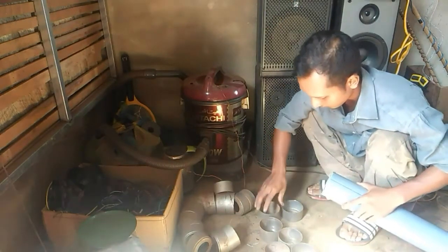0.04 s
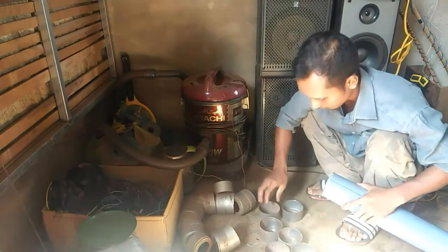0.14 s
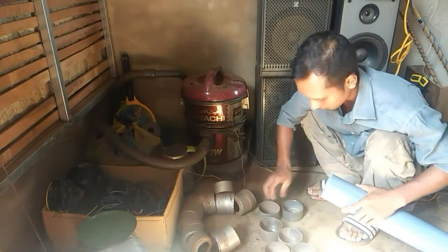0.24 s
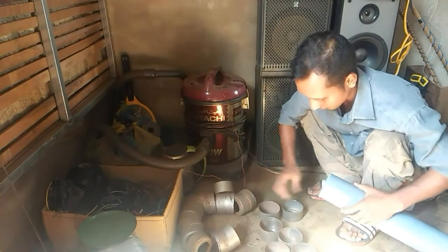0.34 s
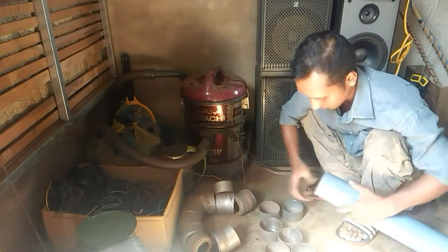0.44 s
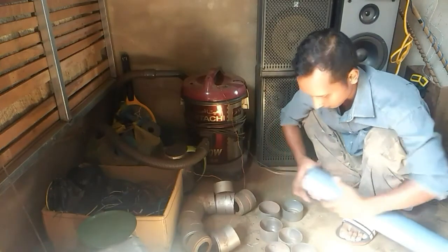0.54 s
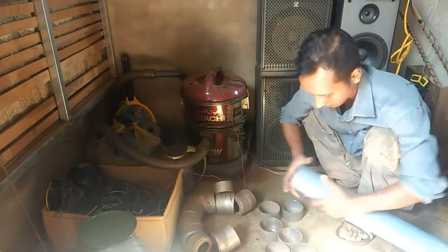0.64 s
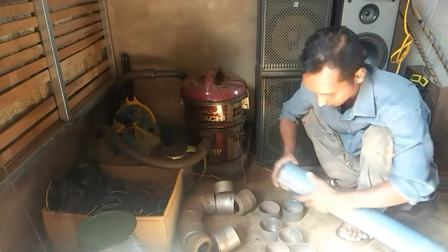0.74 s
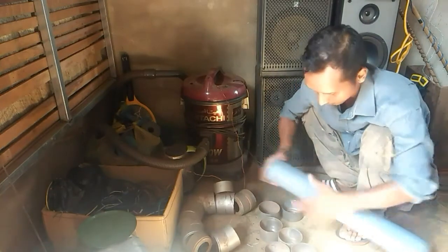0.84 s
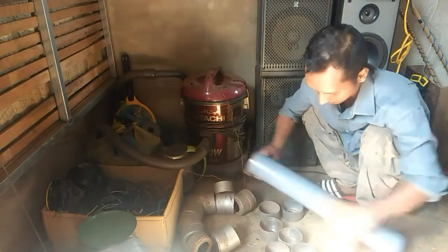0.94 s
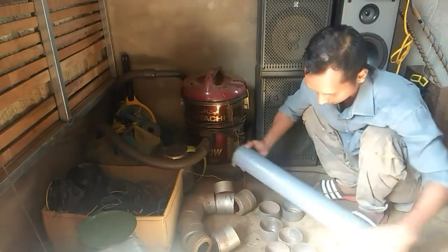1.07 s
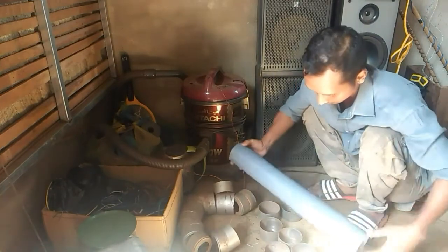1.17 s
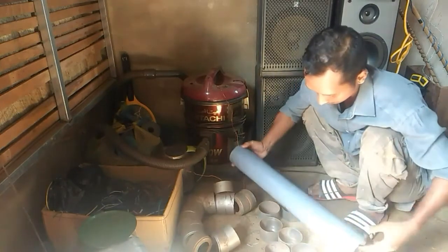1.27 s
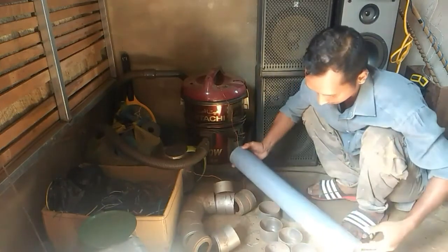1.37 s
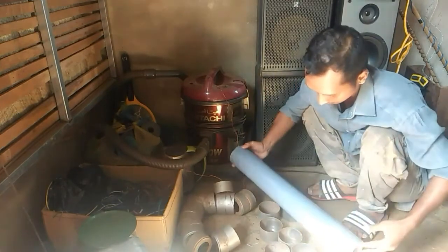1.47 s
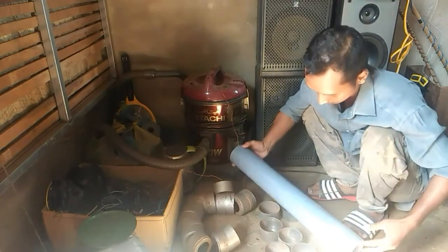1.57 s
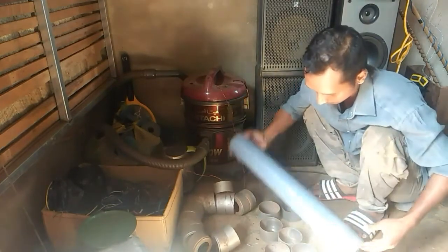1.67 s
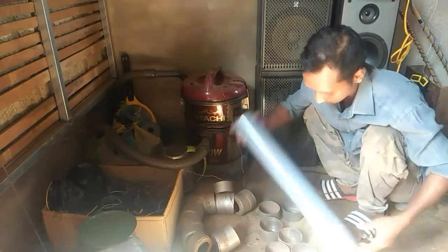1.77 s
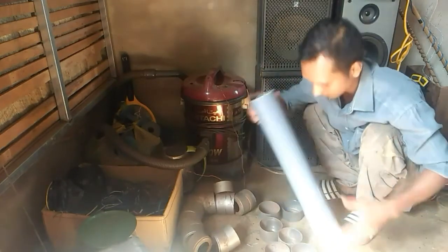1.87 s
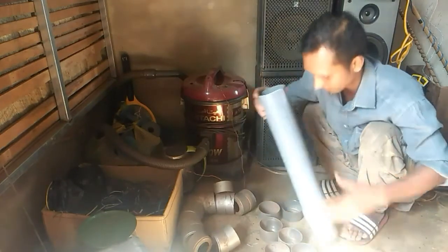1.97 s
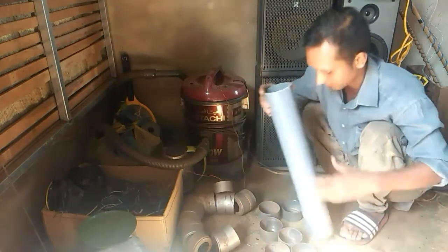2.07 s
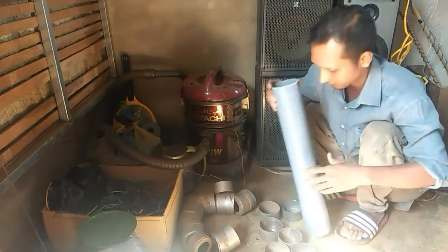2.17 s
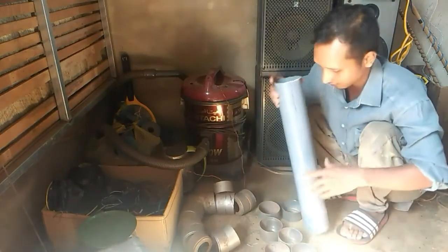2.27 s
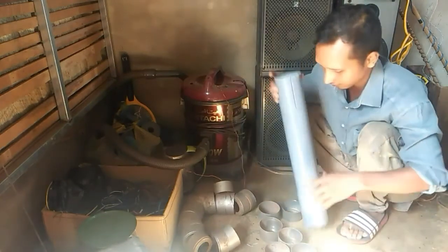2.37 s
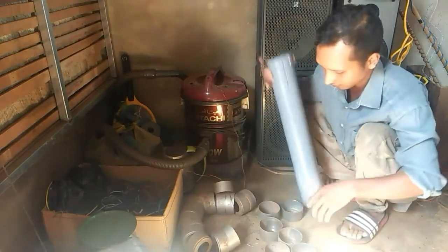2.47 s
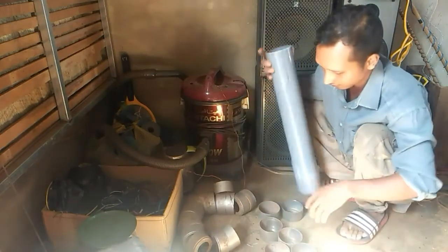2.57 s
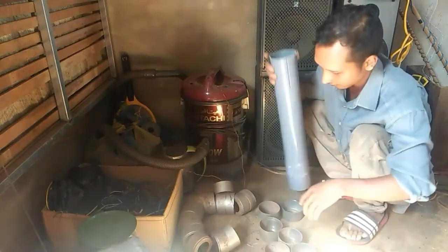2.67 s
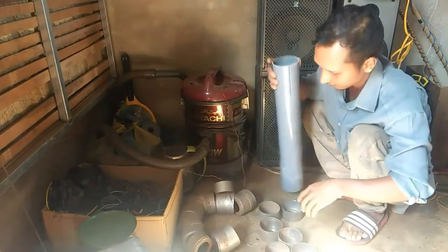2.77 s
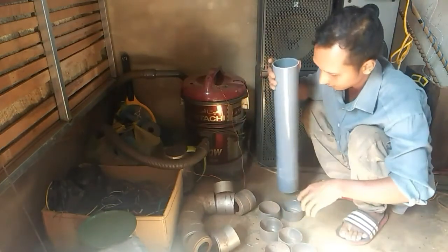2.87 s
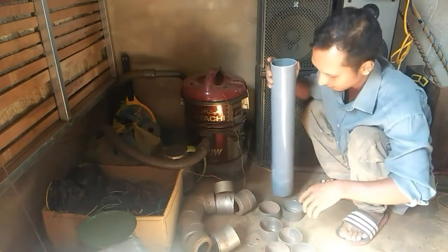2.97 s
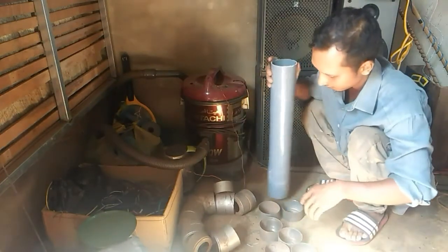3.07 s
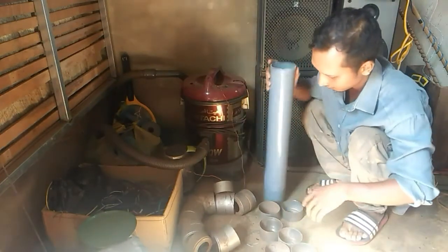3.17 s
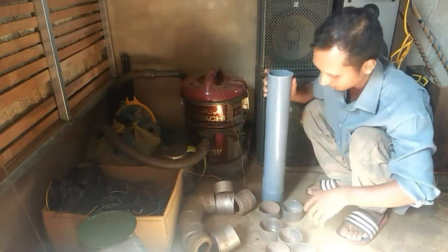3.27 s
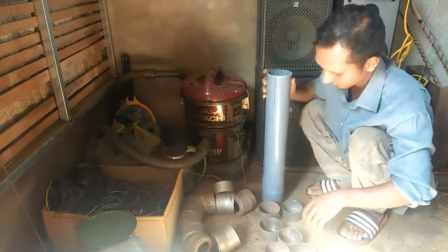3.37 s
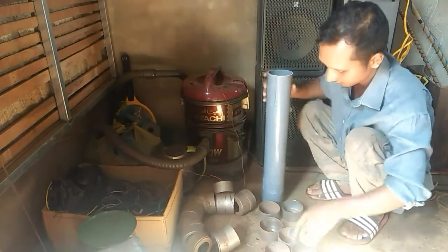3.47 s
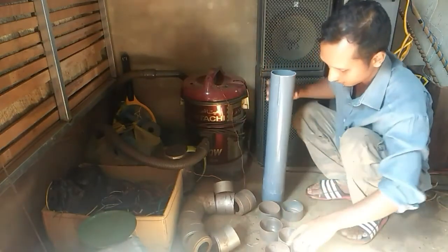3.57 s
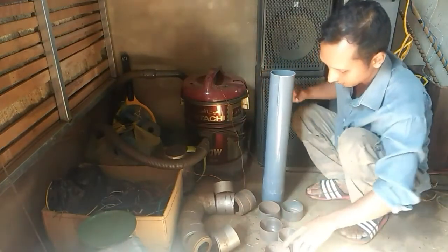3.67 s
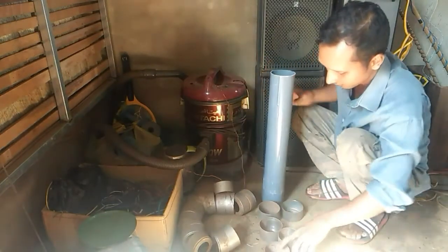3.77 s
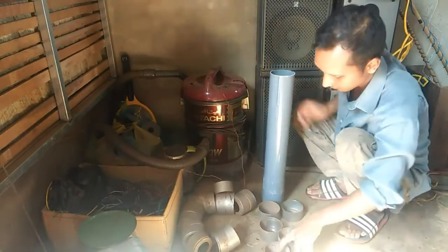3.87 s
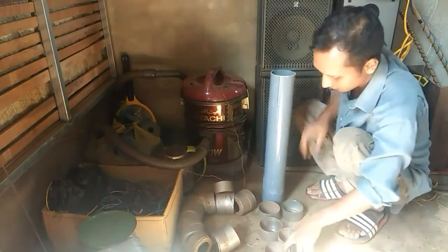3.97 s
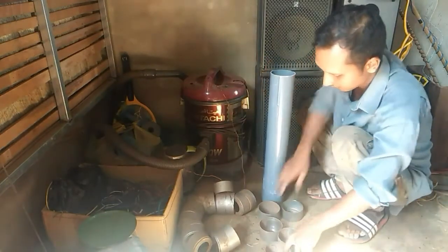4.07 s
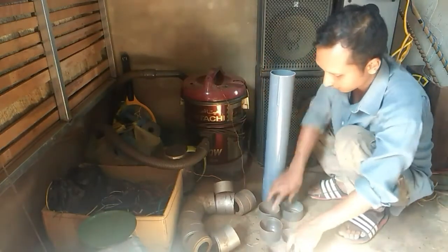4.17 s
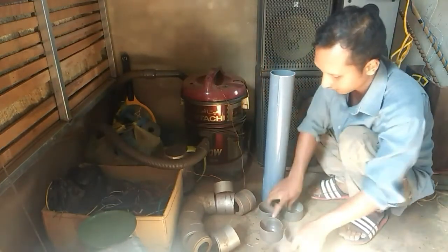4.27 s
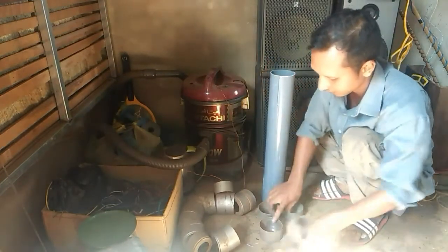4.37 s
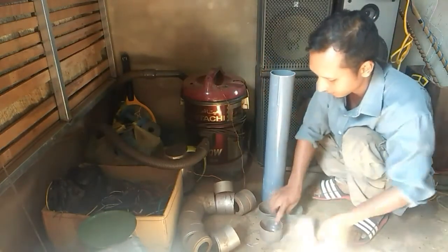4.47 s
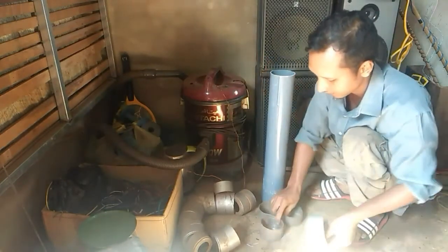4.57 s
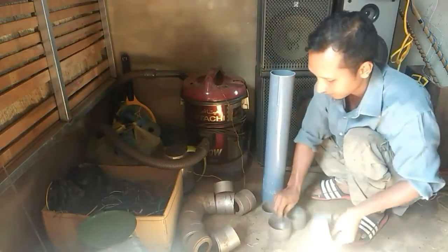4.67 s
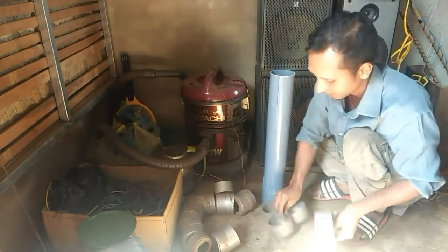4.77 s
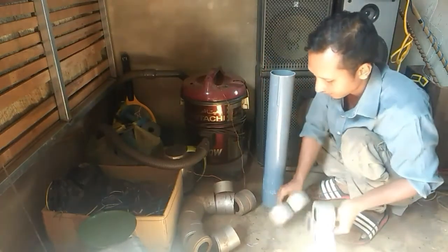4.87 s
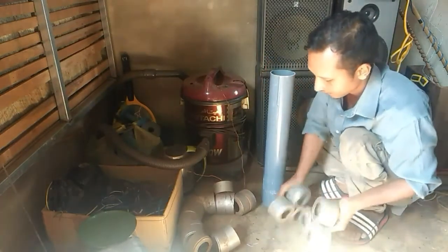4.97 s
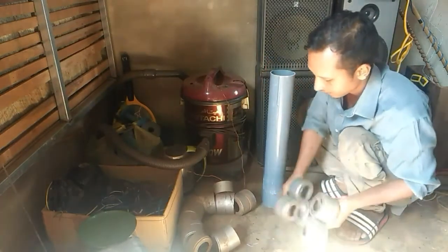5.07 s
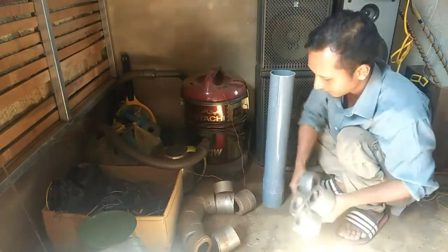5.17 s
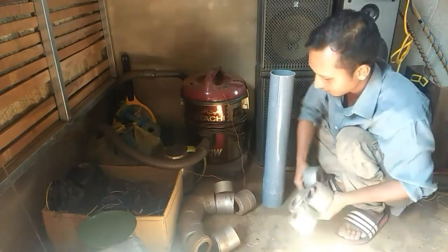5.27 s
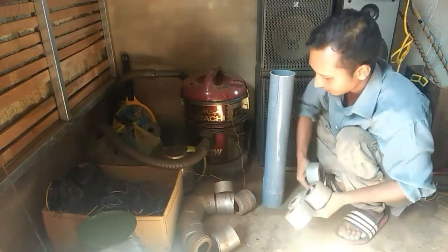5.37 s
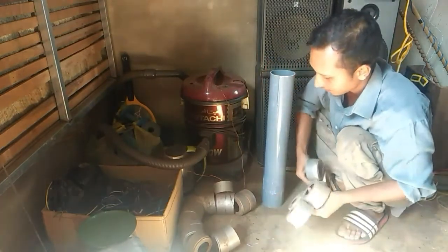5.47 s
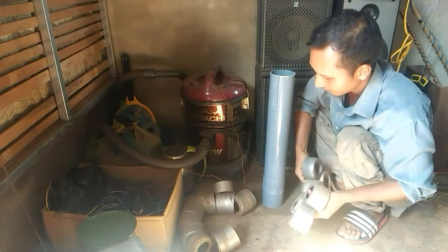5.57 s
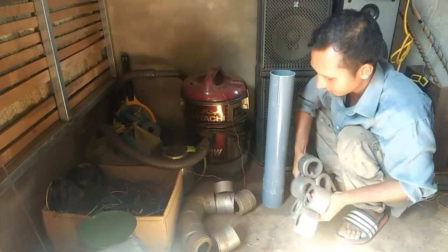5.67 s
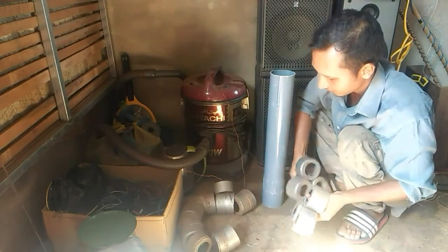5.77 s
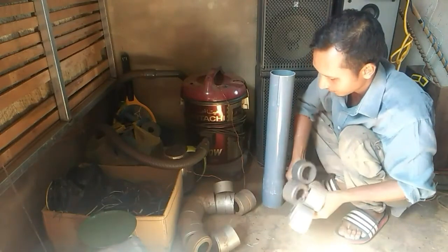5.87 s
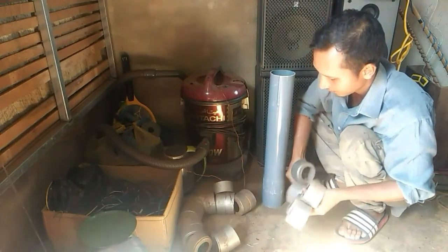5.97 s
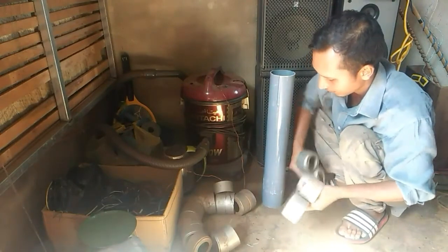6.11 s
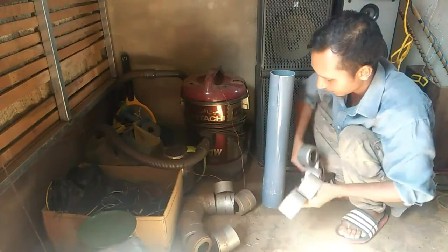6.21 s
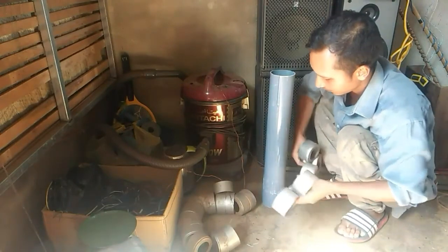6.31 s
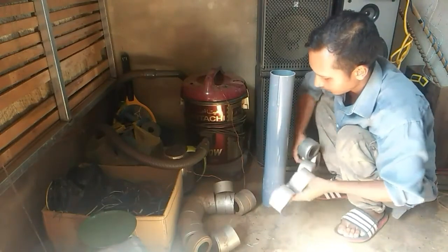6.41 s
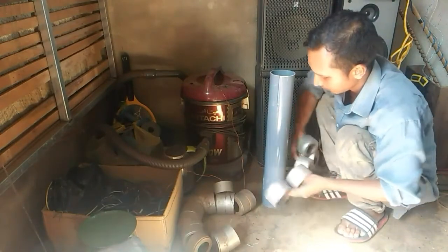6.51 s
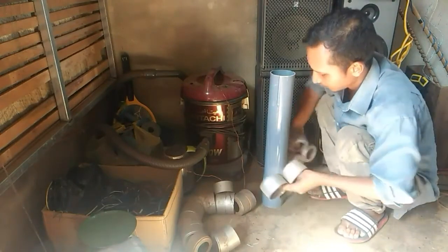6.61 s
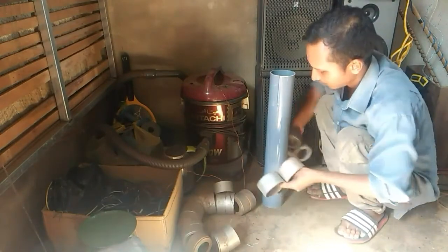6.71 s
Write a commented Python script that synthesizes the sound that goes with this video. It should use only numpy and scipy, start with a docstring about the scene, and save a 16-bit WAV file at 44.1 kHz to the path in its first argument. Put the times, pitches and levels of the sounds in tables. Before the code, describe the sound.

A plastic pipe rasps over gritty concrete, knocks down hollowly on end, then short steel tubes clatter and clink in a small hard room.

```python
"""A small hard-walled room: a plastic pipe slides over concrete and is stood on end with a hollow knock.
Short steel tubes are gathered: they scrape, clatter and clink. Faint tones, a hum and a rumble lie behind.
Impacts ring decaying modes under enveloped noise; friction is random slips through colours and modes.
Tones are sines or resonant noise; hum and rumble are shaped noise."""
import sys
import numpy as np
from scipy import signal
from scipy.fft import rfft, irfft
from scipy.io import wavfile

SR = 44100
rng = np.random.default_rng(int(sys.argv[2]) if len(sys.argv) > 2 else 0)


def log_audio(samples):
    """Write samples as a 16-bit WAV file to the path given in sys.argv[1]."""
    # one column per channel
    frames = np.atleast_2d(samples).T
    # limit to full scale, then quantise
    limited = np.clip(frames, -1, 1)
    pcm = np.round(limited * 32767).astype(np.int16)
    wavfile.write(sys.argv[1], SR, pcm)


N = 297436
TIME = np.arange(N) / SR

# In all tables, rel_db is a relative level, before the gains of the layer.
# ring modes per steel tube: pitch_hz, rel_db, t60_s
TUBE_MODES = {"short": [(3400, -14, 0.12), (4437, -0.5, 0.21), (5880, -4.5, 0.12), (6630, 3, 0.21),
              (7640, -3, 0.18), (9900, 3.5, 0.088), (10240, -1.5, 0.21), (11100, -8, 0.086),
              (12900, -15, 0.31)], "long": [(2216, -8.5, 0.25), (4247, -17.5, 0.29), (6770, -14, 0.14),
              (8580, -6, 0.16), (9100, -14, 0.14), (11390, 3, 0.055), (13200, -6, 0.16)],
              "thin": [(4280, -15.5, 0.74), (5900, -7.5, 0.44), (7930, -0.5, 0.28), (8800, -2, 0.17),
              (11690, -4, 0.23), (13650, -2, 0.31)], "thick": [(2840, -12.5, 0.2), (3210, -19, 0.35),
              (3694, -26, 0.37), (4100, -17, 0.33), (5170, -18.5, 0.88), (5980, -16, 0.3), (6460, -2, 0.11),
              (7980, -1, 0.14), (8440, -17, .2), (9600, 0.5, 0.087)], "wide": [(3140, -3, 0.12),
              (5155, -22.5, 0.23), (8440, 6.5, 0.067), (9800, -5, .13), (11140, -5, 0.11), (13200, -2, .1)],
              "gripped": [(2830, -1, 0.23), (4300, 0.5, 0.19), (5173, -6, 0.42)],
              "light": [(4490, -2.5, 0.094), (5860, -2, 0.17), (6200, -7, 0.096), (7666, -10, 0.17),
              (12260, 3, 0.066)]}
# air-column and wall modes of the pipe: pitch_hz, rel_db, t60_s
PIPE_MODES = [(217, -17.5, 0.33), (427, -26.5, 0.71), (588, -15.5, 0.61), (635.6, 6.5, 0.26),
              (750, -11, 0.13), (756, -3.5, 0.11), (850, -5.5, 0.12), (864, -5.5, 0.17), (1454, -1, 0.34),
              (1484, -4.5, 0.068), (1580, -19.5, 0.2), (2332, 4, 0.096), (2363, -6, 0.18),
              (2635, -20.5, 0.52), (712, 0, 0.091), (1428, 6, 0.087)]
# spectrum of floor clacks and bumps: freq_hz, rel_db
CLACK_SPECTRUM = [(220, -24), (420, -4.5), (560, -5.5), (760, 6), (1250, 5.5), (1700, 0.5), (2400, -15.5),
                  (3600, -27)]
# spectrum of dull rubbing: freq_hz, rel_db
RUB_SPECTRUM = [(140, -5), (215, -25), (285, -2), (400, -6.5), (600, -2.5), (880, 0.5), (1960, -3.5),
                (3000, -11.5), (4500, -25.5)]
# spectrum of steel scraping and cracks: freq_hz, rel_db
SCRAPE_SPECTRUM = [(3000, -17), (5000, -34.5), (7400, -5), (8700, 4.5), (11500, 1.5), (12400, -13),
                   (13500, 6.5), (14400, -42)]


def from_db(db):
    """Decibels to amplitude gain."""
    return 10 ** (np.asarray(db) / 20)


def rms_one(x):
    """Scale to unit rms."""
    return x / np.sqrt(np.mean(x ** 2) + 1e-20)


def at_hz(points, hz):
    """Interpolate a table on a log-frequency axis."""
    f, value = np.transpose(points)
    return np.interp(np.log(hz + 1e-9), np.log(f), value)


def gains(rows):
    """One gain curve per dB column, silent outside the table."""
    s, *columns = np.transpose(rows)
    return [from_db(np.interp(TIME, s, c, left=-np.inf, right=-np.inf)) for c in columns]


def drift(per_s):
    """Smooth random wandering through per_s knots a second; rms 1."""
    knots = rng.standard_normal(N // 100)
    return rms_one(np.interp(TIME * per_s, np.arange(len(knots)), knots))


def strokes(rows, attack_s, release_s):
    """Summed envelopes of (start_s, length_s, db) strokes: exponential swell, hold, exponential decay."""
    total = 0
    for start_s, length_s, db in rows:
        before = np.maximum(start_s - TIME, 0) / attack_s
        after = np.maximum(TIME - start_s - length_s, 0) / release_s
        total = total + from_db(db) * np.exp(-before - after)
    return total


def strikes(hits):
    """Impulse train from (time_s, db) pairs."""
    out = np.zeros(N)
    for s, db in hits:
        out[max(0, round(s * SR))] += from_db(db)
    return out


def coloured(x, spectrum):
    """Filter to a spectrum with steep skirts past its ends; rms 1."""
    hz = np.arange(N // 2 + 1) * SR / N + 0.00085
    low_skirt = np.minimum(1, hz / spectrum[0][0]) ** 3
    high_skirt = np.minimum(1, spectrum[-1][0] / hz) ** 4
    return rms_one(irfft(rfft(x) * from_db(at_hz(spectrum, hz)) * low_skirt * high_skirt, N))


def grains(per_s, spread_db, clump_db=3.5):
    """Random tiny slips of uneven size, stronger and weaker as the pressure changes; rms 1."""
    size_db = spread_db * np.minimum(rng.exponential(1, N), 4) + clump_db * drift(45)
    slips = rng.random(N) < per_s / SR
    return rms_one(slips * from_db(size_db) * rng.choice([-1, 1], N))


def ring(clicks, hz, t60_s):
    """Two-pole resonance: a unit click rings at about height 1; zero response at 0 Hz."""
    r = np.exp(-np.log(1000) / (t60_s * SR))
    w = 2 * np.pi * hz / SR
    return signal.lfilter([.5, 0, -.5], [1, -2 * r * np.cos(w), r * r], clicks + 1e-18)


def resonant_noise(hz, width_hz):
    """Noise through one resonance, twice for steep skirts; rms 1."""
    t60_s = np.log(1000) / (np.pi * width_hz)
    return rms_one(ring(ring(rng.standard_normal(N), hz, t60_s), hz, t60_s))


def crunch(hits, spectrum, t60_s, rise_s):
    """Each contact crushes grit: a noise burst that swells briefly and dies quickly."""
    decay = np.exp(-np.log(1000) / (t60_s * SR))
    envelope = signal.lfilter([1], [1, -decay], strikes(hits) + 1e-18)
    lag = np.exp(-1 / (rise_s * SR))
    envelope = signal.lfilter([1 - lag], [1, -lag], envelope)
    return envelope * coloured(rng.standard_normal(N), spectrum)


def shifting(x, low_hz, high_hz, swing_db, count=18):
    """As the point of contact moves, narrow bands swell and fade each on their own; rms 1."""
    centres_hz = np.geomspace(low_hz, min(high_hz, SR / 2.2), count)
    log_hz = np.log(np.arange(N // 2 + 1) * SR / N + 1)
    spectrum = rfft(x)
    total = 0
    for weights in np.eye(count):
        band = irfft(spectrum * np.interp(log_hz, np.log(centres_hz), weights), N)
        total = total + band * from_db(swing_db * drift(24))
    return rms_one(total)


def room(x, wet_db, build_s=0.00029):
    """Direct sound plus a dense noise tail that builds up and decays octave by octave."""
    # decay time of the room: freq_hz, t60_s
    room_decay = [(150, 0.87), (700, 0.32), (2500, 0.38), (8000, 0.3), (14000, 0.25)]
    t = TIME[:SR]
    white = rfft(rng.standard_normal(SR))
    hz = np.arange(SR // 2 + 1) + 0.00099
    tail = 0
    for centre_hz in 62.5 * 2 ** np.arange(9):
        band = irfft(white * np.maximum(0, 1 - abs(np.log2(hz / centre_hz))), SR)
        tail = tail + band * np.exp(-np.log(1000) * t / at_hz(room_decay, centre_hz))
    tail = tail * (1 - np.exp(-t / build_s))
    return x + from_db(wet_db) * signal.fftconvolve(x, tail / np.linalg.norm(tail))[:N]


def background(flutter_db=3, air_db=-77, hum_hz=77.6):
    """Steady air noise, a passing narrowband hum and an uneven low rumble with one soft thump."""
    # rumble level: time_s, level_db
    rumble_level = [(0, -66), (1.6, -74), (3.2, -67), (4.4, -63.5), (5.3, -60.5), (6.74, -59.5)]
    # soft low thump: start_s, length_s, level_db
    thump = [(5.345, 0.013, -45)]
    # hum: start_s, length_s, level_db
    hum_stroke = [(.33, 1.05, -61.5)]
    # spectra: freq_hz, rel_db
    rumble_spectrum = [(30, -7.5), (42, 4), (78, -2), (130, -8.5), (180, -15.5)]
    air_spectrum = [(130, -23.5), (380, -17), (750, -13), (1100, -13.5), (1720, -18), (2500, -27.5),
                    (15000, -38)]
    low_level = gains(rumble_level)[0] * from_db(flutter_db * drift(9.0))
    low_level = low_level + strokes(thump, attack_s=0.024, release_s=0.027)
    rumble = low_level * coloured(rng.standard_normal(N), rumble_spectrum)
    hum = strokes(hum_stroke, attack_s=0.03, release_s=0.021) * resonant_noise(hum_hz, width_hz=19)
    air = from_db(air_db) * coloured(rng.standard_normal(N), air_spectrum)
    return rumble + hum + air


def pipe_slide(hollow_db=-8, gripped_t60_s=0.058, wander_db=4, chatter_hz=1477):
    """Plastic rasps and catches on gritty concrete; pipe modes answer in turn as the grip shifts."""
    # strokes over the floor: start_s, length_s, rub_rel_db, grit_rel_db
    slides = [(.015, 0.076, -50.5, -52), (0.489, 0.087, -44, -58.5), (0.626, 0.25, -44, -64),
              (0.938, .14, -45.5, -58)]
    # pipe wall chatter: start_s, length_s, rel_db
    chatter_strokes = [(.97, 0.077, -44)]
    # catches on grit or bumps on the floor: time_s, dull_rel_db, gritty_rel_db
    catches = [(0.519, -43.5, -33.5), (0.741, -36.5, -37.5), (0.816, -47, -38.5), (0.909, -72, -29),
               (0.992, -38.5, -32), (1.034, -47, -22.5), (1.871, -58.5, -59), (2.268, -55, -52),
               (2.284, -37, -40.5), (3.712, -54.5, -49.5)]
    # grit spectrum: freq_hz, rel_db
    grit_spectrum = [(3000, -3), (7000, 2.5), (10000, 3.5), (14000, -6.5)]
    attack_s, release_s = 0.063, 0.023
    rub_level = strokes([(s, length, db) for s, length, db, _ in slides], attack_s, release_s)
    grit_level = strokes([(s, length, db) for s, length, _, db in slides], attack_s, release_s)

    slips = grains(1500, 1.6, clump_db=2)
    hollow = 0
    for hz, _, _ in PIPE_MODES:
        hollow = hollow + from_db(wander_db * drift(7.94)) * ring(slips, hz, gripped_t60_s)
    rasp = shifting(coloured(slips, RUB_SPECTRUM), 250, 3500, swing_db=5)
    rubbing = rub_level * (rasp + from_db(hollow_db) * rms_one(hollow))
    chatter = strokes(chatter_strokes, attack_s, release_s) * resonant_noise(chatter_hz, width_hz=130)

    hiss = grit_level * coloured(grains(1200, 2, clump_db=2.5), grit_spectrum)
    bumps = crunch([(s, db) for s, db, _ in catches], CLACK_SPECTRUM, t60_s=0.059, rise_s=0.006)
    scuffs = crunch([(s, db) for s, _, db in catches], grit_spectrum, t60_s=0.011, rise_s=0.0079)
    grit = from_db(-3.5) * hiss + scuffs
    grit = grit.std() * shifting(grit, 3000, 14000, swing_db=3.5)
    return room(from_db(-8) * (rubbing + chatter), wet_db=-4.0) + room(from_db(-2.0) * (bumps + grit), wet_db=3)


def gathering(sing_db=-9, grind_db=-6, wander_db=6, held_t60_s=0.025, tilt_db_per_octave=4,
              jostle_db=-13, jostle_t60_s=0.058, jostles_per_s=410):
    """Rough tube ends grind, set the steel singing and jostle, over the rub of hands and clothes."""
    # hands and clothes moving: time_s, rustle_rel_db
    handling = [(3.45, -60.5), (3.8, -71), (3.9, -68), (4.45, -62), (4.9, -52.5), (5.65, -57.5), (6.2, -55),
                (6.74, -48)]
    # tubes dragged over floor or each other: start_s, length_s, scrape_rel_db, rub_rel_db
    drags = [(0.022, 0.066, -48, -56.5), (4.1, 0.023, -45.5, -45), (4.207, 0.19, -53, -53.5),
             (4.626, 0.017, -36, -36.5), (4.774, 0.021, -46, -34.5), (4.986, 0.043, -42.5, -50),
             (5.116, .26, -49.5, -73), (5.466, 0.099, -49, -61), (5.746, 0.03, -52, -52.5),
             (5.997, 0.073, -44.5, -52), (6.21, 0.17, -59.5, -55), (6.66, 0.093, -51.5, -48)]
    attack_s, release_s = 0.018, 0.036
    hands, = gains(handling)
    drag_rub = strokes([(s, length, db) for s, length, _, db in drags], attack_s, release_s)
    drag_scrape = strokes([row[:3] for row in drags], attack_s, release_s)
    rub_level = np.hypot(hands, drag_rub)
    scrape_level = np.hypot(from_db(-9) * hands, drag_scrape)   # handling also scrapes lightly

    cloth = shifting(coloured(grains(4000, 2, clump_db=1.5), RUB_SPECTRUM), 500, 3000, swing_db=4)
    rubbing = from_db(-5.5) * rub_level * cloth
    slips = grains(900, 1.0, clump_db=0.0)
    grinding = scrape_level * shifting(coloured(slips, SCRAPE_SPECTRUM), 6000, 14000, swing_db=4)

    # fingers damp the rings; tiny slips favour high modes; different ones answer as the contact wanders
    singing = 0
    for hz, db, _ in TUBE_MODES["thick"] + TUBE_MODES["long"] + TUBE_MODES["wide"]:
        drive_db = db / 2 + tilt_db_per_octave * np.log2(hz) + wander_db * drift(25)
        singing = singing + ring(slips * from_db(drive_db), hz, held_t60_s)

    # held tubes differ in size: small knocks wake different pitches
    pitches_hz = np.geomspace(2706, 10980, 40)
    jostling = 0
    for hz in pitches_hz:
        knocks = rng.random(N) < jostles_per_s / len(pitches_hz) / SR
        jostling = jostling + ring(knocks, hz, jostle_t60_s)
    steel = from_db(sing_db) * rms_one(singing) + from_db(jostle_db) * rms_one(jostling)
    return room(rubbing + from_db(grind_db) * grinding + scrape_level * steel, wet_db=-5.0)


def contacts(bounce_s=.015, bounce_loss_db=6.5):
    """Every steel strike on floor or tube, each followed by one weaker bounce."""
    # strikes: time_s, tick_rel_db, clack_rel_db, ring_rel_db, tube
    clinks = [(.034, -61, -49, -42, "short"), (0.075, -61, -57, -40.5, "short"),
              (3.874, -58.5, -46.5, -55, "thin"), (3.904, -68, -62, -49.5, "thin"),
              (3.941, -52, -40, -56.5, "thin"), (4.102, -28, -40, -43.5, "long"),
              (4.198, -30, -40.5, -51, "long"), (4.215, -23, -29, -27.5, "long"),
              (4.313, -59, -45.5, -46, "thin"), (4.525, -44, -47, -46, "short"),
              (4.573, -53, -44, -44, "short"), (4.627, -21, -30, -34, "thick"),
              (4.648, -16, -26, -49, "wide"), (4.658, -18, -33, -24.5, "long"),
              (4.688, -38, -39, -41, "wide"), (4.743, -17.5, -18.5, -31, "thick"),
              (4.755, -20, -31.5, -31, "wide"), (4.785, -16.5, -21, -20.5, "thick"),
              (5.103, -38.5, -44.5, -44.5, "gripped"), (5.493, -58, -59, -66, "gripped"),
              (5.696, -45, -55, -57.5, "short"), (5.78, -40, -54, -32, "light"),
              (5.808, -59, -70, -43, "light"), (6.076, -39.5, -48.5, -43, "wide"),
              (6.71, -35, -46, -50, "wide"), (6.719, -25.5, -35.5, -35, "wide")]
    bounces = []
    for s, *levels_db, tube in clinks:
        bounces.append((s + bounce_s, *[db - bounce_loss_db for db in levels_db], tube))
    return [row for row in clinks + bounces if row[0] < TIME[-1]]


def tube_rings(hits, uneven_db=2, detune=0.0018, pressed_db=-15, pressed_spread=0.083, pressed_t60_s=0.083):
    """Blows ring slightly detuned modes, so they beat; contact with other tubes adds short stray partials."""
    out, click = np.zeros(N + SR), signal.unit_impulse(SR)
    for s, tick_db, _, ring_db, tube in hits:
        blow = out[round(s * SR):][:SR]   # view: adding here writes into out
        for hz, db, t60_s in TUBE_MODES[tube]:
            strength, off, *strays = rng.standard_normal(4)
            gain = from_db(ring_db + db + uneven_db * strength)
            blow += gain * ring(click, hz * (1 + detune * off), t60_s)
            for stray in strays:
                gain = from_db(tick_db + pressed_db + db / 2)
                blow += gain * ring(click, hz * np.exp(pressed_spread * stray), pressed_t60_s)
    return out[:N]


def steel_clinks():
    """Steel hits steel or concrete: dry crack, gritty tick, floor clack and the ring of the tube."""
    # tick spectrum: freq_hz, rel_db
    tick_spectrum = [(2200, 3.5), (2900, 0), (5000, -4), (7400, -3.5), (8900, 5.5), (10400, 3.5),
                     (11500, -1), (12400, 4), (14400, -33)]
    hits = contacts()
    bright = [(s, db) for s, db, *_ in hits]
    dull = [(s, db) for s, _, db, *_ in hits]
    ticks = crunch(bright, tick_spectrum, t60_s=0.023, rise_s=0.0091)
    cracks = crunch(bright, SCRAPE_SPECTRUM, t60_s=0.012, rise_s=0.0003)
    clacks = crunch(dull, CLACK_SPECTRUM, t60_s=0.03, rise_s=0.0038)
    rings = room(from_db(-5) * tube_rings(hits), wet_db=0.1)
    ticks = room(from_db(-2.5) * ticks, wet_db=2.5)
    clacks = room(from_db(-3.0) * clacks, wet_db=3)
    return rings + ticks + clacks + from_db(-10) * cracks


def wavering_tone(hz, waver):
    """A sine of unsteady pitch and level; much unsteadiness makes it hoarse."""
    phase = 2 * np.pi * np.cumsum(hz * (1 + waver * drift(500))) / SR
    return from_db(1.5 * drift(25)) * np.sin(phase)


def far_tones(whine_hz=715.5, fade_db=14.5, overtone_step_db=-5.5):
    """A faint fluttering tone of resonant noise, and short squeaks that swell quickly, glide and fade."""
    # fluttering tone: time_s, level_db
    whine_level = [(.12, -64.5), (.3, -63.5), (1.25, -67.5), (1.9, -89), (2.72, -76), (3.1, -84.5)]
    # squeaks: start_s, length_s, from_hz, to_hz, level_db, octave_overtone_rel_db, pitch_waver (fraction)
    squeaks = [(0.148, 0.285, 1216, 910, -67.5, 1, 0.04), (1.331, 0.17, 2060, 2230, -76, -32, 0.08),
               (1.874, 0.3, 1132, 1115, -66.5, -34, 0.02), (2.921, 0.64, 873, 898, -75.5, -20, 0.04),
               (3.041, 0.22, 1760, 1745, -76, -33.5, 0.01)]
    tones = gains(whine_level)[0] * resonant_noise(whine_hz, width_hz=27)
    for start_s, length_s, from_hz, to_hz, db, overtone_db, waver in squeaks:
        progress = np.clip((TIME - start_s) / length_s, 0, 1)
        hz = from_hz + (to_hz - from_hz) * progress
        envelope = from_db(db + fade_db * (.5 - progress)) * np.sin(np.pi * np.sqrt(progress))
        partials_db = [0] + [overtone_db + overtone_step_db * k for k in range(4)]
        for k, partial_db in enumerate(partials_db, 1):
            tones += envelope * from_db(partial_db) * wavering_tone(k * hz, waver)
    return room(tones, wet_db=-6)


def nudges(t60_s=0.038, width_hz=180, scrape_db=-0.5):
    """Gripped tubes slip on each other: a short dry tick around one heavily damped mode, plus scrape."""
    # nudges: time_s, level_db, pitch_hz
    ticks = [(1.929, -68.5, 3140), (1.99, -64.5, 9700), (4.045, -52.5, 8120), (4.483, -48, 8740),
             (4.655, -19, 11500), (5.274, -44, 13100), (5.984, -44, 8800), (6.411, -48, 10500),
             (6.521, -44, 11700)]
    noise = rng.standard_normal(N)
    scrapes = [(s, db + scrape_db) for s, db, _ in ticks]
    out = crunch(scrapes, SCRAPE_SPECTRUM, t60_s=t60_s, rise_s=0.00076)
    for s, db, hz in ticks:
        mode = rms_one(ring(noise, hz, np.log(1000) / (np.pi * width_hz)))
        out = out + mode * strokes([(s, 0, db)], attack_s=0.00092, release_s=t60_s / np.log(1000))
    return room(out, wet_db=1)


def pipe_knocks():
    """The rim lands and rocks on the floor; softer contacts, lowpassed, wake mainly the low modes."""
    # rim contacts: time_s, ring_rel_db, bandwidth_hz, clack_rel_db
    rim_contacts = [(3.2885, -23, 510, -43), (3.2955, -15.5, 4100, -14.5), (3.3097, -34.5, 1500, -16.5),
                    (3.3318, -21.5, 2210, -18.5), (3.3444, -15, 620, -29), (3.3681, -22.5, 598, -22)]
    # clack spectrum: freq_hz, rel_db
    knock_spectrum = [(215, -16), (430, -22), (680, 3), (950, -8.5), (1210, -14.5), (1490, -2),
                      (1770, -24.5), (2370, -10.5), (3500, -28), (5000, -31.5), (13500, -41)]
    blows = 0
    for s, db, bandwidth_hz, _ in rim_contacts:
        soft = signal.butter(2, min(bandwidth_hz, SR / 3), fs=SR)
        blows = blows + signal.lfilter(*soft, strikes([(s, db)]) + 1e-18)
    body = sum(from_db(db) * ring(blows, hz, t60_s) for hz, db, t60_s in PIPE_MODES)
    # soft plastic radiates little treble
    body = signal.sosfilt(signal.butter(4, 3000, fs=SR, output="sos"), body)
    clack = crunch([(s, db) for s, _, _, db in rim_contacts], knock_spectrum, t60_s=0.034, rise_s=0.0016)
    return room(from_db(-6.0) * body, wet_db=-16.5) + room(from_db(-5.5) * clack, wet_db=6.5)


def scene(width_hz=4600, width_db=-12):
    """Central sources plus a scattered, mostly treble side signal of drifting level, opposite left and right."""
    mid = background() + pipe_slide() + gathering() + steel_clinks() + far_tones() + nudges() + pipe_knocks()
    highpass = signal.butter(4, min(width_hz, SR / 3), "high", fs=SR, output="sos")
    treble = signal.sosfiltfilt(highpass, mid)
    scatter = rng.standard_normal(SR // 100)
    scatter = scatter - scatter[::-1]   # antisymmetric
    scatter = scatter / np.linalg.norm(scatter)
    scattered = signal.fftconvolve(treble + from_db(-58) * mid, scatter, "same")
    side = from_db(width_db) * drift(70) * scattered
    return np.array([mid + side, mid - side])


def record(dry, cutoff_hz=14600):
    """Steep elliptic lowpass."""
    return signal.sosfilt(signal.ellip(12, .2, 80, cutoff_hz, fs=SR, output="sos"), dry)


dry = scene()
out = record(dry)
log_audio(out)
```